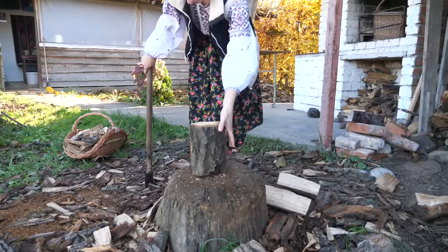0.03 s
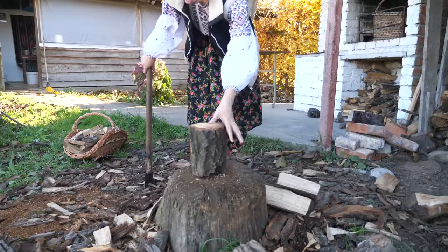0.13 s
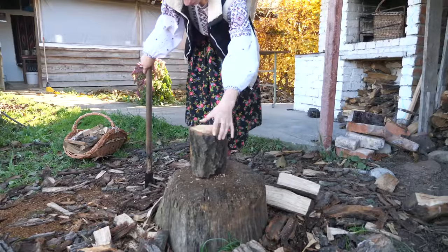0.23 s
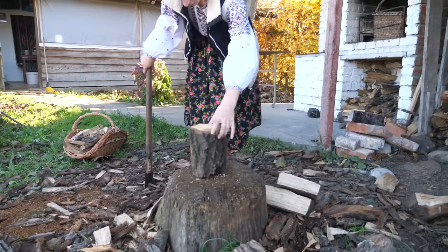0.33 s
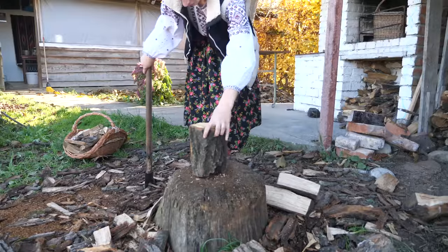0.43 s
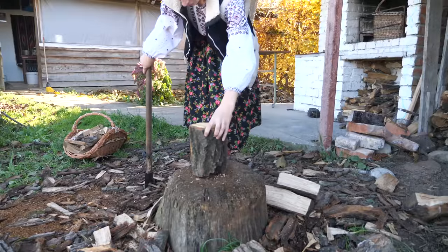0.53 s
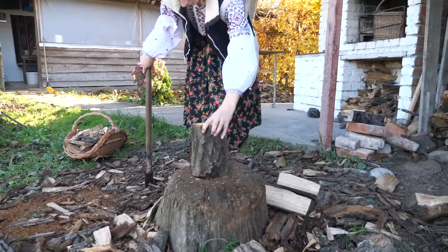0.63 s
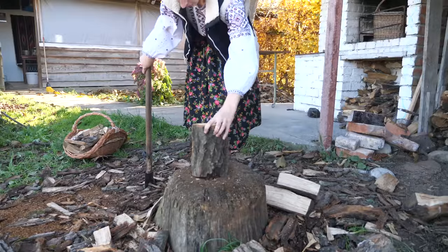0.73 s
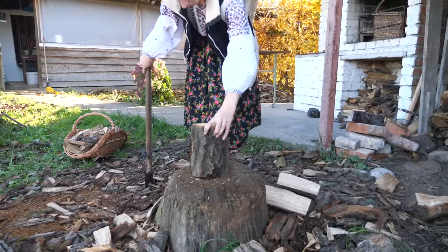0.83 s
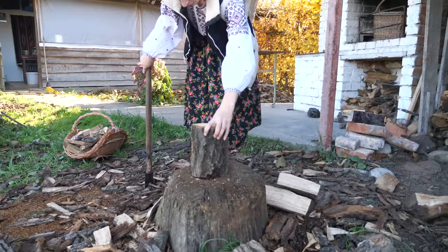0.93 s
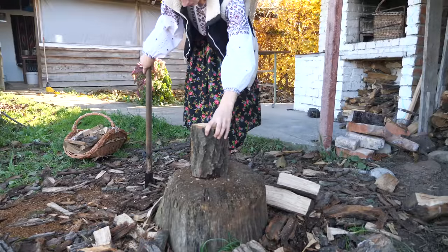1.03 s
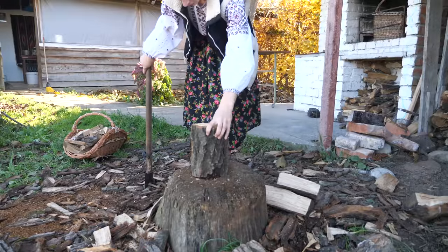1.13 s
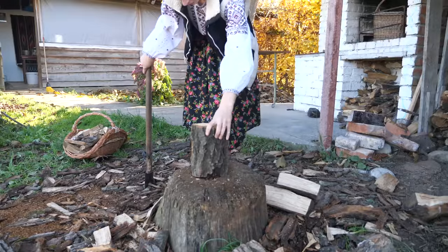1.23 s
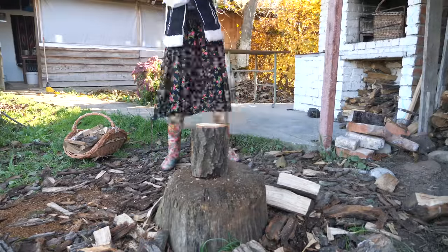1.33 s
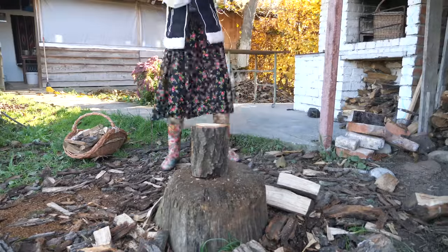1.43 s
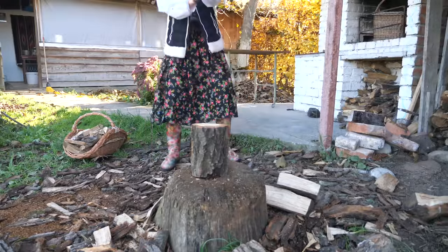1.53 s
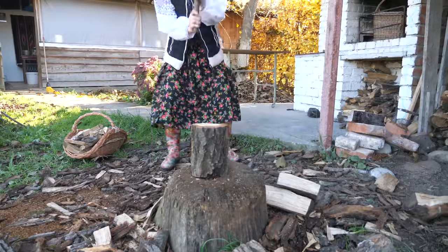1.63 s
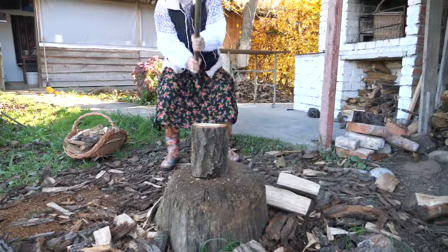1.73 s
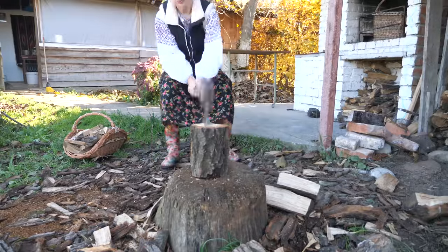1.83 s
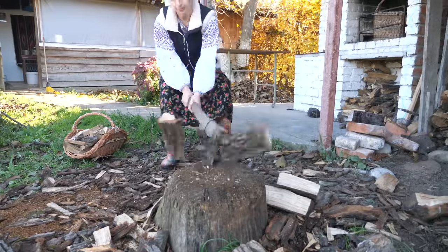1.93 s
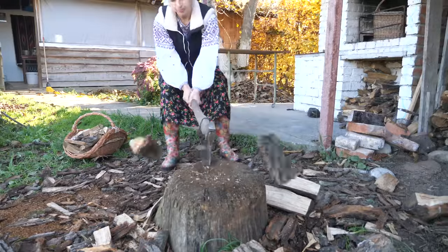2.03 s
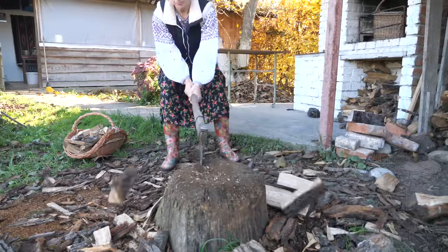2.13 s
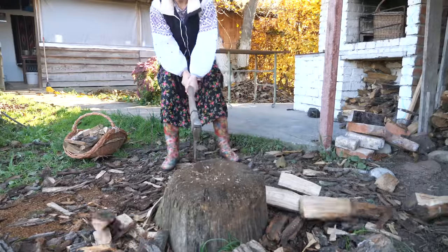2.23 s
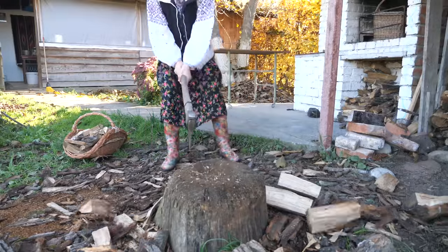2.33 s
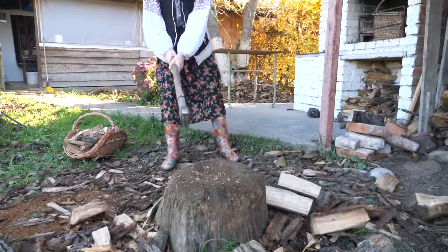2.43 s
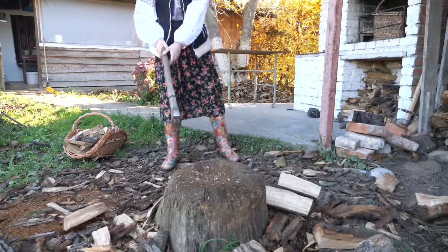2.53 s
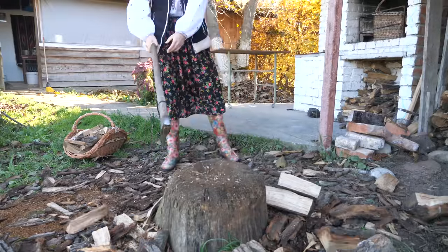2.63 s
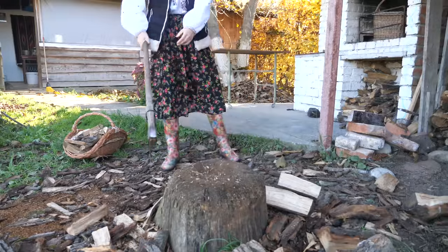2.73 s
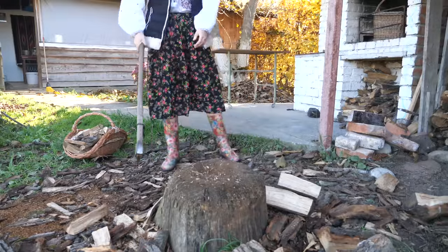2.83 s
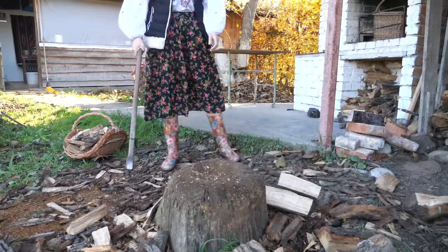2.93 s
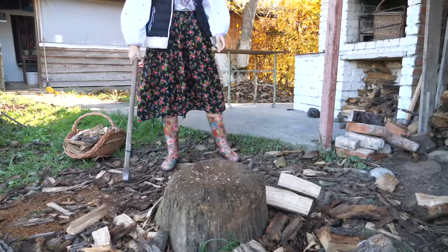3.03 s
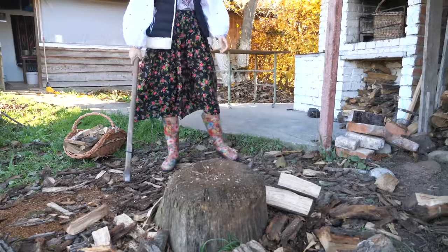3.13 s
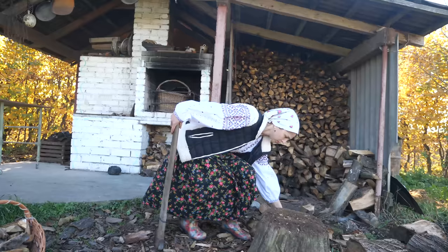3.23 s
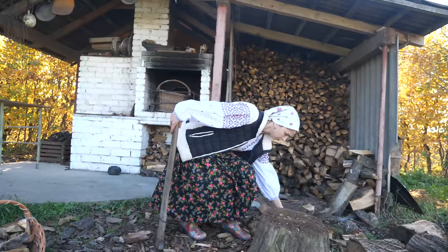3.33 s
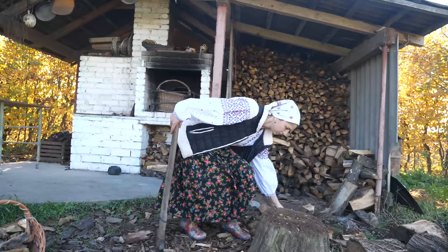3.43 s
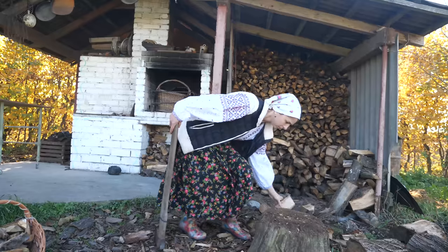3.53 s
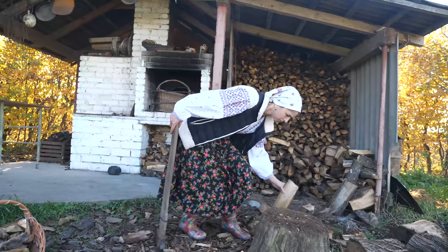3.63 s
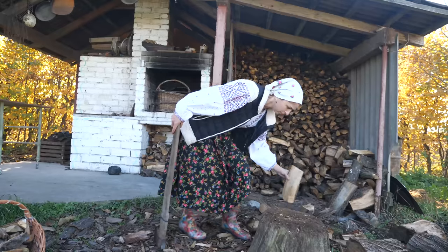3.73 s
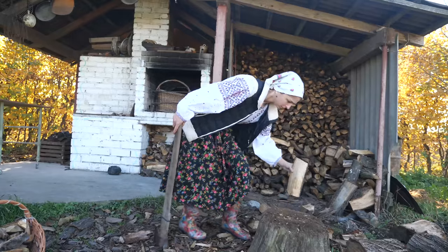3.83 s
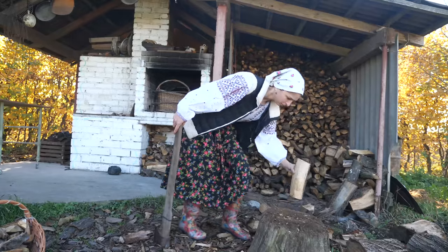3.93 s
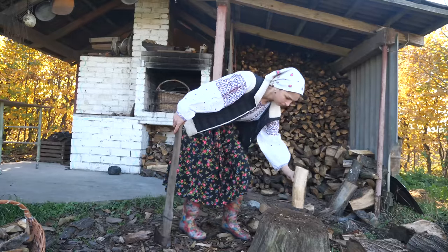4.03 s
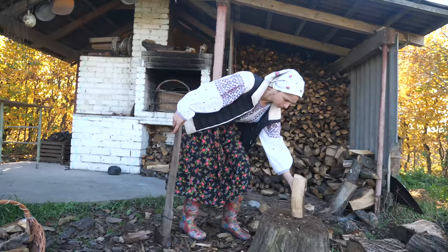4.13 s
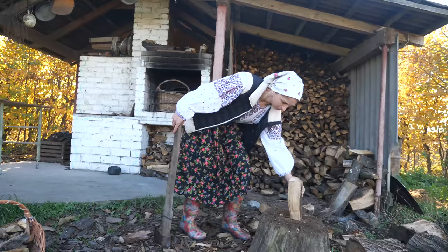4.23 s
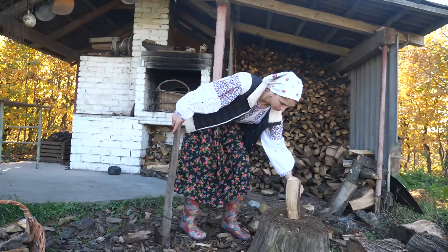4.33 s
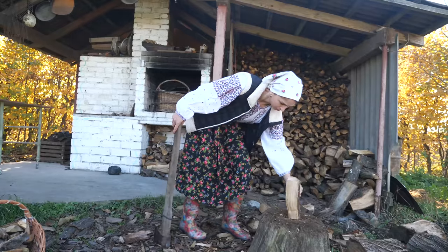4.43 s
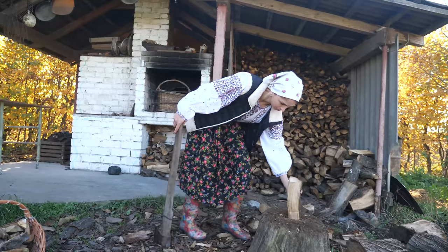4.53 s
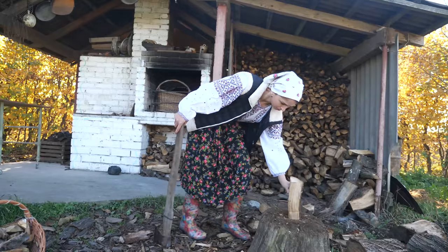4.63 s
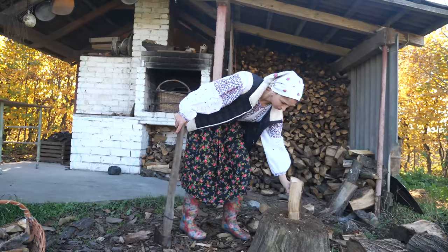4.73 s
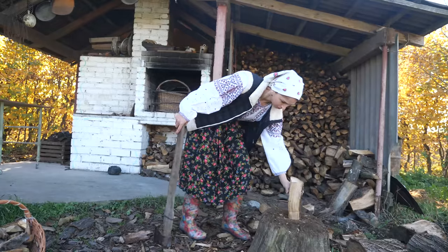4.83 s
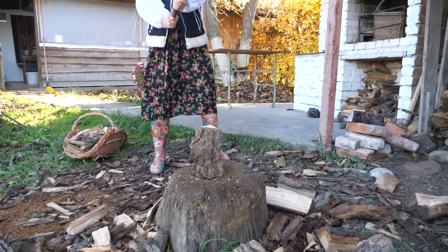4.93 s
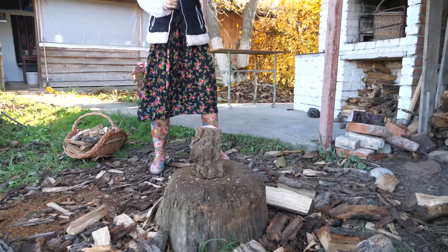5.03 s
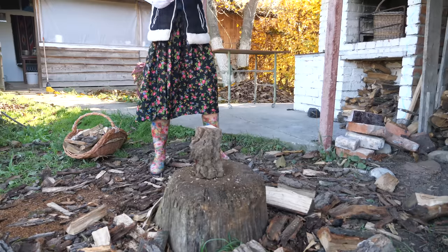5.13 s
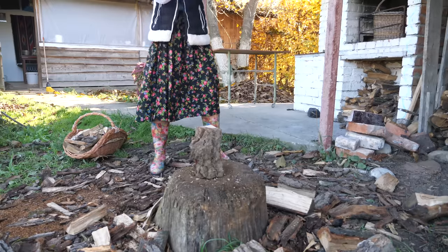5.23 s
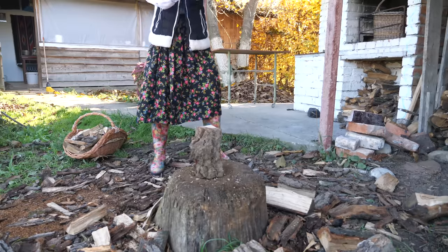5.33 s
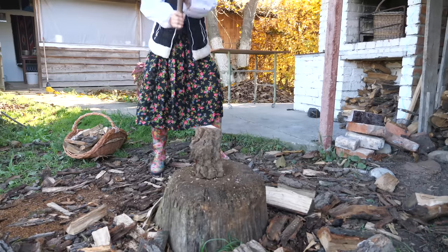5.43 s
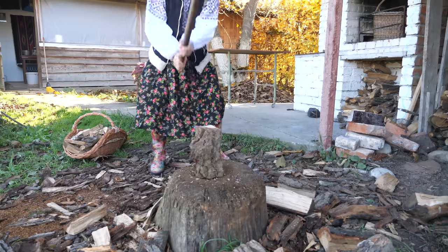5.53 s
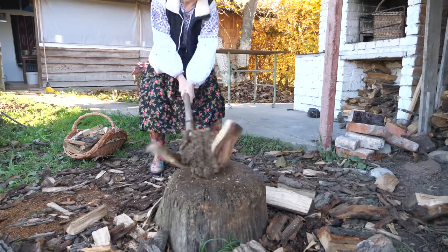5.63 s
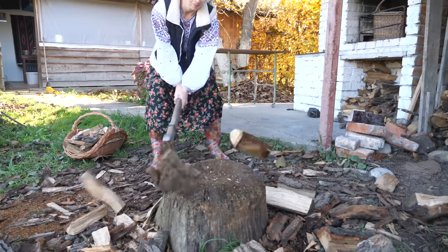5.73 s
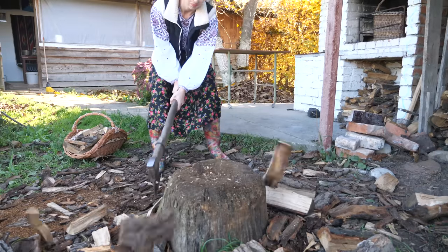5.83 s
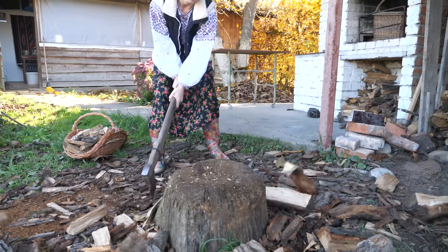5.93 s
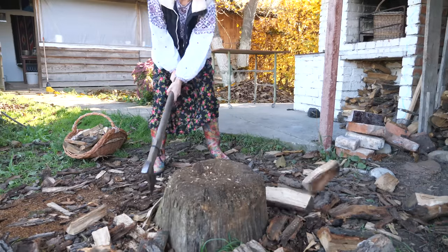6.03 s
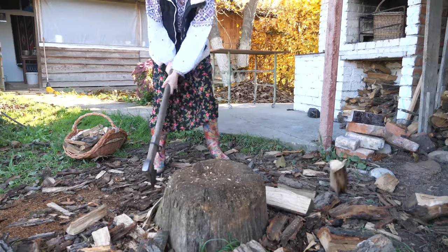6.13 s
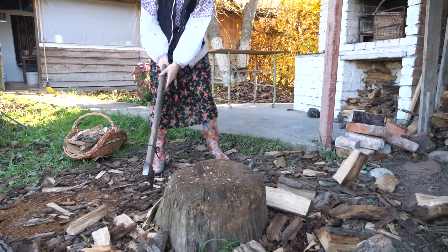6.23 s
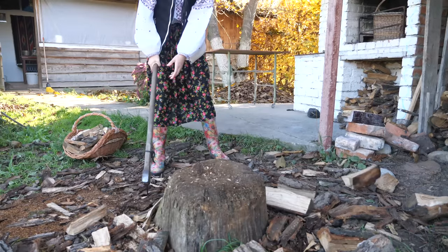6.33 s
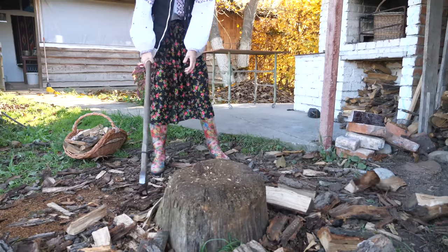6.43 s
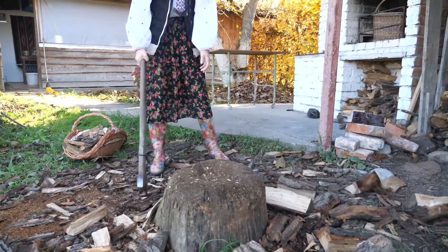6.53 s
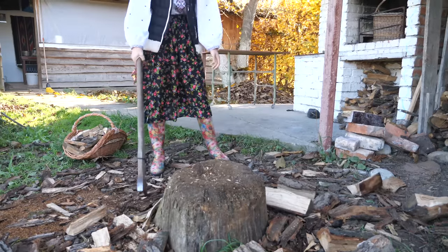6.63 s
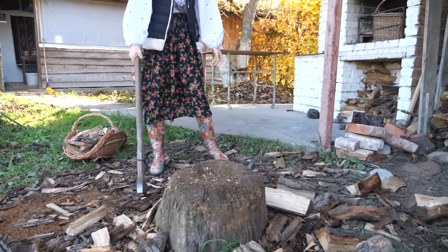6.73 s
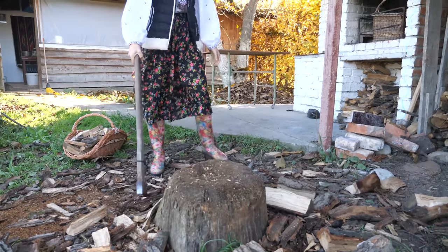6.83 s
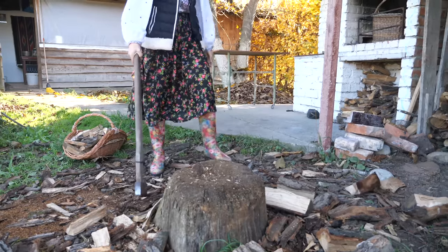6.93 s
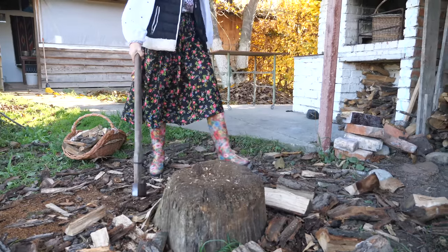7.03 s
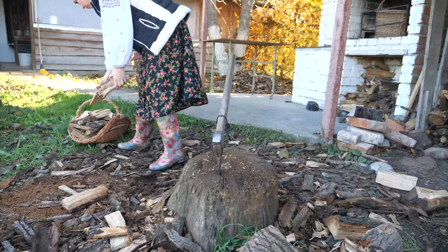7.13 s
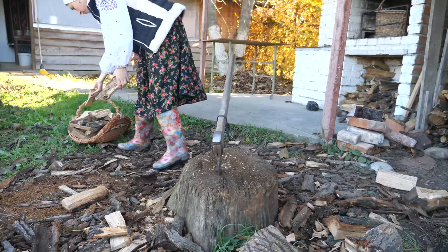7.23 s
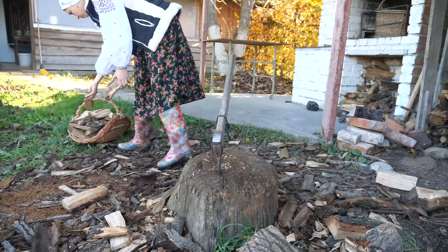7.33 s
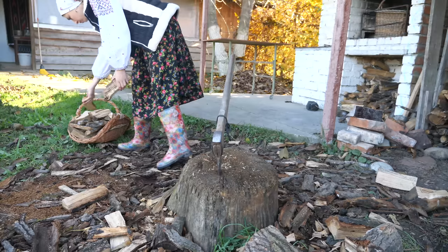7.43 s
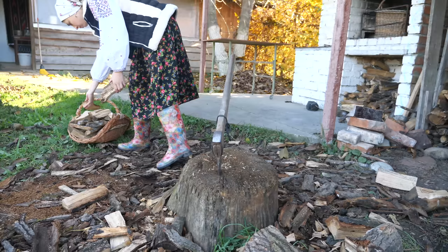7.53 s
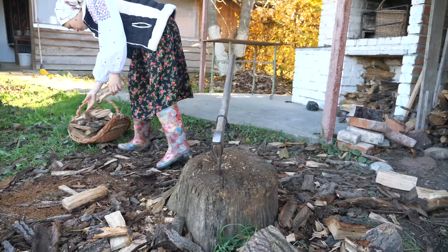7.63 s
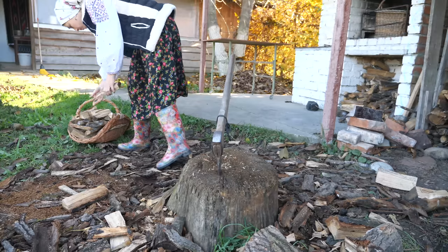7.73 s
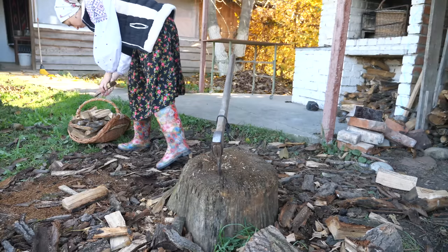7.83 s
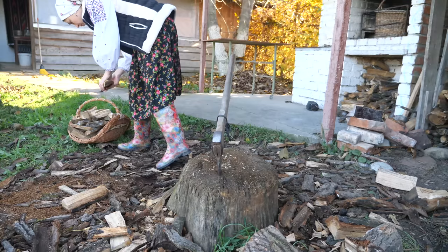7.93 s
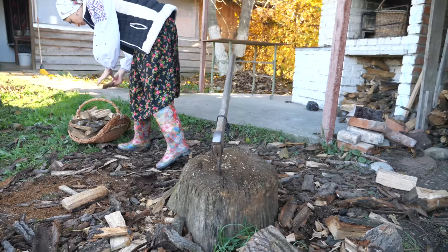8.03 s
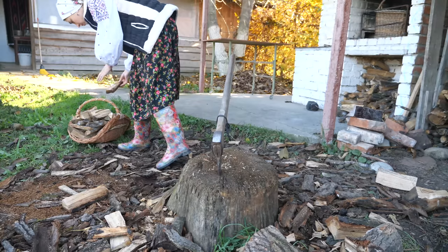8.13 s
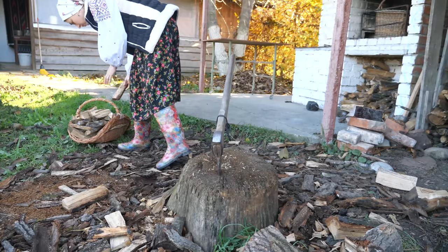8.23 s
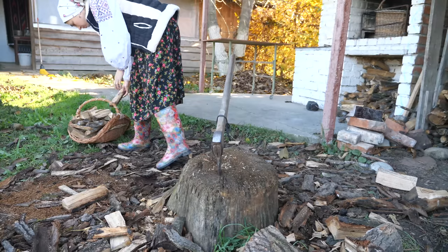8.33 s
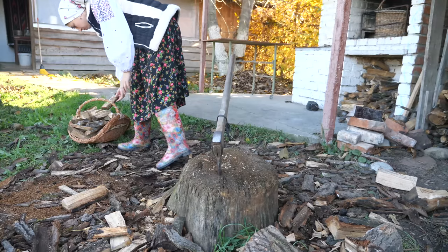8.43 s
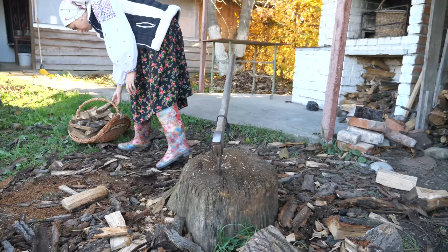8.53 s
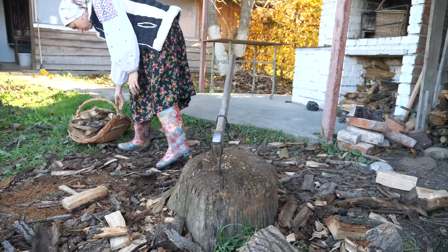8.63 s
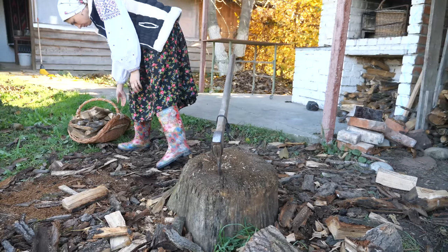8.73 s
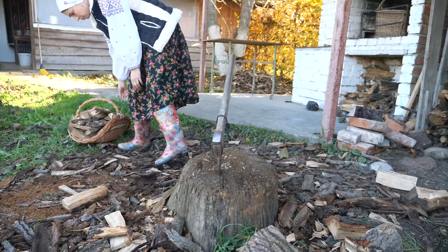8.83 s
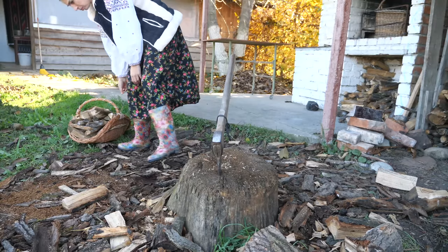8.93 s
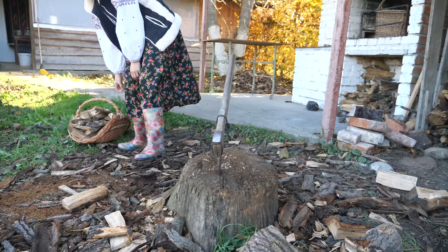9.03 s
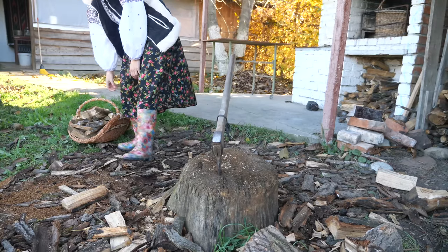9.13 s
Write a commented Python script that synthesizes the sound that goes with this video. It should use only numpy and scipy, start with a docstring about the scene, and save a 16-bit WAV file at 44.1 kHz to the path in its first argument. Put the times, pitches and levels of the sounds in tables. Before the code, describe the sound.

An axe splits two logs on a stump outdoors, halves knocking and tumbling into bark litter, with a gust of microphone wind between the blows.

```python
"""Splitting logs in a yard

An axe splits two logs on a stump: short wood rings with crackling noise, tearing grains and low ground thuds.
The pieces knock and bounce, and later kindling is dropped in a basket: smaller blows, plus a slat that rings
on. Boots and hands rustle the bark litter, made of grainy noise. Low noise buffeting quickly and unevenly is
wind on the microphone; the noise stops abruptly, and a brief low bump comes later. A faint country hiss that
changes level and soft far tones lie behind; a noise tail echoes the wood off the house and woodshed."""
import sys
import numpy as np
from scipy import signal
from scipy.fft import rfft, irfft, next_fast_len
from scipy.io import wavfile
from scipy.ndimage import uniform_filter1d

SR = 44100
rng = np.random.default_rng(int(sys.argv[2]) if len(sys.argv) > 2 else 0)


def put_to_file(sound):
    """Save the sound as 16-bit audio at rate SR, in the file named by the first command-line argument."""
    columns = np.atleast_2d(sound).T  # one column per channel
    safe = np.clip(columns, -1, 1)
    whole_steps = np.round(safe * 32767)
    wavfile.write(sys.argv[1], SR, whole_steps.astype(np.int16))


N = 405719
T = np.arange(N) / SR

# In all tables, t60_s is the time a sound takes to fall by 60 dB.
# Blade meets the log, then the stump under it: start_s, level_db, low_ring_hz, high_ring_hz, high_ring_db,
# rattle_db, crack_db, ring_t60_s, crack_t60_s, rise_ms (the three parts are relative to level_db)
AXE_BLOWS = [(1.8853, 9.5, 664, 1433, -12, -5, -10.5, 0.0085, 0.017, .6),
             (1.9149, 9, 635, 1400, -4.5, -7, -22, 0.0095, 0.015, 2.38),
             (5.6489, 7.5, 1028, 1957, -5, 1, -3.5, 0.0088, 0.019, 1.9),
             (5.6781, -1.5, 540, 1115, -3, -6, -15.5, 0.015, 0.01, 1.9)]
# Fibres tearing as the blade runs down the log: start_s, level_db, centre_hz, t60_s
FIBRE_TEARS = [(1.888, -21, 850, 0.036), (1.92, -25.5, 848, .19), (5.653, -14.5, 1250, 0.081),
               (5.684, -26, 900, 0.2)]
# Wood knocking on wood: start_s, level_db, low_ring_hz, high_ring_hz, high_ring_db, rattle_db, crack_db, ring_t60_s
WOOD_KNOCKS = [(.765, -56, 900, 4800, 2, -3, -2, .014), (1.161, -56, 750, 3450, 18, -3, 9, 0.012),
               (2.185, -16, 493, 1620, -14, -14, -26, .014), (2.1965, -25.5, 334, 1800, 5, 0, -4, .018),
               (2.236, -33, 570, 3140, -6, -3, -6, .03), (2.248, -11, 485, 2585, 2, -1, -20, .02),
               (2.2675, -9, 1037, 2600, -10, -8, -22, .022), (2.279, -31, 1070, 3260, 5, -4, -8, .018),
               (2.345, -36, 660, 1720, -21, 2.5, -12, 0.034), (2.358, -36, 1430, 3490, -22, -7, -12, 0.016),
               (2.395, -46, 1150, 5320, 4, -3, -2, .01), (2.512, -39, 1280, 2490, 1, -1, -3.5, 0.019),
               (2.526, -41, 554, 5150, -6, -5, -1, .015), (2.553, -29, 511, 4550, -11, -3, -16, 0.0085),
               (2.597, -30, 1310, 3570, -8, 0, -5, .0095), (2.634, -43, 1120, 4800, -3, -4, -7, .018),
               (3.079, -48, 1510, 2650, 6, 5.5, 5.5, 0.035), (4.35, -46, 1573, 1876, 4, -14, -14, .03),
               (5.366, -47, 1000, 1690, -9.5, 3, -28.5, 0.015), (5.791, -47, 1390, 6500, 0, -6, 0, .016),
               (5.864, -31.5, 1160, 3430, -1, 7.5, 1.5, 0.021),
               (5.9432, -23, 500, 1490, -20, -14, -20, .012), (5.9472, -9, 447, 1300, -3, -7, -15, .014),
               (5.976, -32, 420, 2570, -14, -14, -10, .02), (5.9855, -25, 950, 2600, -14, -6, -12, .02),
               (6.028, -42, 650, 4800, -6, -3, 0, .02), (6.033, -33, 650, 3060, -19, -9.5, -11, .021),
               (6.075, -43, 457, 4960, -8, -9, -12, .018), (6.109, -21.5, 1330, 2700, 0, 3, -24, .013),
               (6.176, -26, 523, 5200, -12, -8, -14, .016), (6.1805, -32, 2030, 3500, -3, 0, -6, .014),
               (6.191, -31, 1200, 1740, -9, 6, -3, .012), (6.2, -25, 1143, 1610, -7, 4, -10, .014),
               (6.363, -41, 310, 5420, -12, -6, -9, 0.027), (6.4222, -7, 824, 1950, -12, -6, -27, .011),
               (6.4288, -22, 500, 1950, -2, -6, -18, .016), (6.4485, -28, 850, 2020, -8, -6, -18, 0.013),
               (6.467, -38, 867, 4500, -2, 0, -3, .014), (6.491, -44, 680, 5300, 4, -6, 0, .014),
               (6.693, -50, 1615, 4910, 17, 0, 8, 0.016), (6.777, -48.5, 647, 2217, 0.5, 1.5, -26, 0.039),
               (6.861, -56, 312, 4700, 4, -1, -2, 0.019), (7.125, -53, 676, 4710, 4, -8, 6, 0.021),
               (7.26, -41, 496, 4990, 8, -3, 0, 0.012), (7.277, -45, 737, 5320, 8, -10, -4, 0.015),
               (7.324, -47.5, 829, 5230, -8.5, -8, -13, .015), (7.396, -46, 1450, 3220, -13, -9, 1, 0.024),
               (7.411, -52, 654, 5340, 3.5, 2, 4, 0.01), (7.48, -52.5, 613, 5470, 8, -16, 7, .024),
               (7.497, -58, 613, 5000, 0, -16, 8, .02), (7.615, -39.5, 1414, 1547, -8, -16, -15, 0.021),
               (7.624, -39, 1414, 3450, 10, -2, -2, 0.025), (7.642, -35, 1493, 3470, -6, -7, -6, 0.05),
               (7.686, -49.5, 1500, 3520, 6, -10, 3, 0.017), (7.718, -41, 650, 3120, -9, -4, -12, .02),
               (7.725, -35, 940, 1580, -23.5, -6.5, -14, .05), (8.572, -43, 676, 1640, -5, -2, -23, .016),
               (8.609, -44, 930, 1604, -12, 0, -20, .015), (8.628, -39.5, 1370, 3520, -9, -5, -7, .07)]
# Spectrum of cracking wood, only its shape counts: pitch_hz, level_db
CRACK_SPECTRUM = [(88, -43.5), (150, -9), (789, 0), (1420, -4), (2050, -6.5), (2310, -12.5), (4750, -18),
                  (6130, -20), (9790, -27), (16000, -36)]
# Ringing modes of a dry slat: pitch_hz, level_db, t60_s
SLAT_MODES = [(702, -7, .1), (1356, 1, .12), (2364, 5, .08), (3500, -5, .11), (5100, -3, .11)]
# Taps on the slat: start_s, level_db
SLAT_TAPS = [(6.111, -39), (6.245, -55), (6.288, -66)]
# The ground booms under the stump and the heavier pieces: start_s, level_db, t60_s
GROUND_THUDS = [(1.89, -25, .45), (1.914, -27, .4), (2.249, -42, .17), (5.678, -30, .54), (5.947, -44, .21),
                (6.031, -37, 0.087), (6.19, -41, .16), (6.424, -29, .15), (8.63, -54, .5)]
# How long each band of the yard echo lasts: centre_hz, t60_s
YARD_DECAY = [(200, .27), (450, .25), (900, .23), (1800, .22), (3600, .19), (7000, .15), (12500, .11)]
# Strength of the echo in each of those bands, relative: level_db
YARD_LEVELS = [-22, -21.5, -20, -18.5, -19, -21, -23.5]
# Bark and leaves keep rustling while pieces and boots move: start_s, end_s, level_db
LITTER_BEDS = [(2.189, 3.15, -65.5), (5.87, 6.8, -67.5), (6.799, 7.851, -74), (8.3, 9.2, -79.5)]
# Pieces and boots crunch through the litter: peak_s, level_db, rise_s, t60_s, treble_share_db
LITTER_CRUNCHES = [(2.2, -46, .013, 0.11, -6), (2.27, -48, 0.038, 0.18, -18),
                   (2.352, -48.5, .0052, 0.07, -9), (2.514, -56.5, 0.028, .12, -20),
                   (2.566, -45.5, 0.038, .14, -11), (2.599, -43, 0.022, 0.21, -4.5),
                   (2.67, -62.5, 0.057, .17, -20), (3.085, -50, 0.011, 0.054, -23),
                   (5.87, -37, .005, 0.038, -25), (5.96, -54, .011, 0.22, 1),
                   (6.033, -55, .0096, .078, -13), (6.12, -47.5, .013, 0.15, -35),
                   (6.19, -52, 0.047, .071, -22), (6.378, -58, 0.026, 0.11, -12),
                   (6.43, -47, .008, .15, -42), (6.479, -49, 0.034, 0.088, -23),
                   (6.785, -63, .0077, .074, -18), (6.88, -67.5, 0.061, 0.24, -10),
                   (7.07, -65.5, .05, .2, -12), (7.262, -47.5, .0072, 0.076, 1),
                   (7.402, -60, .006, 0.063, 8), (7.65, -52.5, 0.019, 0.18, -24),
                   (7.731, -58, .01, 0.13, -38), (8.61, -66, 0.036, .13, -40), (8.633, -55, .011, .14, -28),
                   (9.19, -68.5, 0.14, .1, -15)]
# Spectrum of the rustle, only its shape counts: pitch_hz, level_db
LITTER_SPECTRUM = [(710, -31), (1200, -1.5), (1440, 0.5), (1720, -4.5), (5400, -0.5), (6710, -14),
                   (9590, -15.5), (14800, -18), (16000, -14)]
# A hand scuffs the bark and shifts the log: centre_s, level_db, centre_hz
HAND_SCUFFS = [(.032, -61.5, 2480), (.125, -62, 3460), (.25, -56, 3000), (.34, -69.5, 3000),
               (.49, -66, 3600), (.597, -68, 3500), (.662, -69.5, 4050), (.95, -74, 4470),
               (1.049, -71.5, 3500), (4.313, -72, 1940), (4.364, -65.5, 1766)]
# Two lists of points, wind on the microphone and then a brief low bump: time_s, level_db
WIND_AND_BUMP = [
    [(3.24, -52), (3.252, -44.5), (3.3, -37.5), (3.382, -48), (3.43, -36), (3.484, -41.5), (3.526, -33.5),
     (3.684, -41.5), (3.716, -36), (3.79, -38), (3.814, -46), (3.842, -37), (3.892, -32), (4.06, -45),
     (4.096, -40), (4.142, -53), (4.208, -35.5), (4.296, -48.5), (4.338, -44), (4.49, -51), (4.578, -37),
     (4.778, -50), (4.894, -40), (4.905, -42)],
    [(7.05, -54), (7.066, -51), (7.088, -47), (7.106, -47)],
]
# Spectrum of both, only its shape counts: pitch_hz, level_db
GUST_SPECTRUM = [(8.8, -31.5), (15, -1), (40, -7), (113, -9), (234, -20), (372, -35), (414, -28.5),
                 (514, -46), (600, -44.5), (780, -76), (1320, -120)]
# A lighter breeze, deep rumble only: time_s, level_db
LIGHT_BREEZE = [(6.46, -56), (6.69, -55), (6.79, -63), (6.84, -46), (6.91, -59.5), (7.04, -59),
                (7.08, -43.5), (7.14, -60), (7.3, -71), (7.44, -61), (7.52, -83), (7.96, -65), (8.25, -79),
                (8.34, -63), (8.39, -80), (8.75, -76), (8.76, -70), (9.19, -70.5)]
# Faint far tones: start_s, length_s, pitch_hz, level_db
FAR_TONES = [(1.34, 0.27, 560, -75.5), (4.255, 0.087, 429, -65), (4.255, .1, 860, -81),
             (4.255, 0.12, 1286, -72.5)]
# Background hiss over time: time_s, low_part_db, middle_part_db
AIR_LEVELS = [(0, -71, -72.5), (1.18, -74, -75.5), (1.5, -71, -72.5), (1.8, -69.5, -69.5),
              (2.8, -68, -67.5), (3.15, -73, -69), (3.25, -70.5, -72.5), (4.88, -71.5, -77.5),
              (4.95, -71, -73), (5.55, -70.5, -71), (6.55, -71, -68.5), (6.85, -71, -75.5),
              (7.15, -66.5, -74), (7.5, -66.5, -69), (7.98, -67.5, -76.5), (8.47, -69.5, -72.5),
              (8.84, -67, -76.5), (9.2, -68, -69)]
# Spectrum of the background hiss, only its shape counts: pitch_hz, level_db
AIR_SPECTRUM = [(29, -30.5), (50, -3.5), (145, -11), (213, -5.5), (252, -13), (305, -5.5), (344, -10.5),
                (398, -8), (677, -9), (1910, -15), (3250, -14.5), (5260, -16), (6230, -23.5),
                (14100, -30.5), (16000, -37)]
# Peaks and dips of the microphone: centre_hz, width_hz, level_db
MIC_PEAKS = [(2580, 1500, -0.5), (3460, 400, 2.5), (4060, 400, -3), (4940, 1000, 0.5)]

KNOCK_RISE_MS = 1.3
KNOCK_CRACK_T60_S, CRACK_S_PER_DB = .044, .00036  # for a knock at 0 dB; weaker knocks crackle shorter
SWING_DB, SWING_HZ = -62, 520  # rush of air just before the blade lands
SWING_GROWTH_S = .36  # time in which the rush grows by 60 dB
GROUND_ECHO_DB = -1.5  # pieces on the ground reach the walls less than the axe on the stump
LITTER_TREBLE_DB = -12.5  # treble share of the rustling beds
BASS_DB, BASS_PER_TREBLE = -9.5, -0.42  # the duller the rustle, the more bass it has
SCUFF_S = .055
WIND_BRIGHT_DB, WIND_STRONG_DB, BRIGHT_PER_DB = -16, -35, .6  # upper share at a strong gust, and its slope
CALM_DB = -84  # breeze level outside its table
TOP_HZ = 15900  # nearly everything above is cut


def undb(db):
    """Turns decibels into a plain loudness factor."""
    return 10 ** (np.asarray(db) / 20)


def unit(x):
    """Scales a sound to an average (rms) strength of 1."""
    return x / np.sqrt(np.mean(x ** 2))


def colour(x, points):
    """Shapes the spectrum by points of pitch and level."""
    hz, db = np.transpose(points)
    size = next_fast_len(len(x))
    f = np.maximum(np.fft.rfftfreq(size, 1 / SR), 1)
    gain = undb(np.interp(np.log(f), np.log(hz), db))
    return irfft(rfft(x, size) * gain, size)[:len(x)]


def band(x, low_hz, high_hz):
    """Keeps mainly the pitches between two limits."""
    return signal.sosfilt(signal.butter(2, [low_hz, high_hz], "band", fs=SR, output="sos"), x)


def fade(t, t60):
    """Falls by 60 dB in t60 seconds."""
    return np.exp(-np.log(1000) * t / max(t60, 1e-3))


def add(track, start_s, sound):
    """Mixes a sound into the track at a given time."""
    i = int(start_s * SR)
    track[..., i:i + np.shape(sound)[-1]] += sound[..., :N - i]


def curve(tables, column, rest):
    """Draws one column of several tables over time, with the rest value outside them."""
    out = np.full(N, rest)
    for rows in map(np.array, tables):
        inside = (T >= rows[0, 0]) & (T <= rows[-1, 0])
        out[inside] = np.interp(T[inside], rows[:, 0], rows[:, column])
    return out


def walk(rate_hz):
    """Wanders smoothly between random values that change rate_hz times a second."""
    hold = int(SR / rate_hz)
    steps = np.repeat(rng.standard_normal(N // hold + 1), hold)
    smooth = uniform_filter1d(uniform_filter1d(steps, hold), hold)
    return 1.4 * smooth[:N]  # makes up for the spread lost in smoothing


def blows(table):
    """Each blow rings two short wood modes, rattles broadly and splits off bright crackle."""
    out, t = np.zeros(N), T[:SR // 10]
    for start_s, db, low_hz, high_hz, high_db, rattle_db, crack_db, ring_t60, crack_t60, rise_ms in table:
        crackle = colour(rng.standard_normal(len(t)), CRACK_SPECTRUM)
        rattle = unit(band(crackle, 0.54 * low_hz, 6000))  # a small piece has no bass
        # the highest treble gets an extra fade, so it dies first
        top = band(crackle, 5400, 15500) * 2.5 * fade(t, 1.3 * crack_t60)
        hiss = unit(band(crackle, 2500, 6500)) + top / np.std(band(crackle, 1800, 6500))
        # higher modes lose more to the fibres
        high = np.sin(2 * np.pi * high_hz * t) * fade(t, ring_t60 * 4000 / high_hz)
        low = np.sin(2 * np.pi * low_hz * t)
        ring = undb(high_db) * high - low
        body = (ring + undb(rattle_db) * rattle) * fade(t, ring_t60)
        crack = undb(crack_db) * hiss * fade(t, crack_t60)
        # a softer contact builds up longer
        rise = np.sin(np.pi / 2 * np.minimum(1000 * t / max(rise_ms, .1), 1)) ** 2
        add(out, start_s, undb(db) * rise * (body + crack))
    return out


def tearing():
    """Fibres give way in dense uneven snaps, coloured by the log."""
    out, t = np.zeros(N), T[:SR // 4]
    for start_s, db, hz, t60 in FIBRE_TEARS:
        snaps = rng.standard_normal(len(t)) * undb(2.0 * rng.exponential(size=len(t)))
        log = unit(band(snaps, hz / 1.7, hz * 1.6))
        fibres = 1.3 * unit(colour(snaps, CRACK_SPECTRUM))
        add(out, start_s, undb(db) * (log + fibres) * fade(t, t60))
    return out


def swings():
    """Air rushes around the axe, growing until the blade lands on each log."""
    hiss = colour(rng.standard_normal(N), AIR_SPECTRUM)
    rush = unit(band(hiss, SWING_HZ / 1.4, SWING_HZ * 1.4))
    level = np.zeros(N)
    for land_s, *_ in AXE_BLOWS[::2]:  # every other row is the stump
        level += undb(SWING_DB) * (T < land_s) * fade(np.abs(land_s - T), SWING_GROWTH_S)
    return level * rush


def thuds():
    """Low noise swells in a few milliseconds and dies in the soil, its deepest part last."""
    out, t = np.zeros(N), T[:SR // 2]
    for start_s, db, t60 in GROUND_THUDS:
        noise = rng.standard_normal(len(t))
        knock = unit(band(noise, 170, 380)) * fade(t, .5 * t60)
        boom = 0.06 * unit(band(noise, 35, 170)) * fade(t, t60)
        add(out, start_s, undb(db) * (knock + boom) * (1 - np.exp(-t / 0.0014)))
    return out


def knocks():
    """Blows share one contact time; the harder the knock, the longer it crackles."""
    table = []
    for row in WOOD_KNOCKS:
        crack_t60 = KNOCK_CRACK_T60_S + CRACK_S_PER_DB * row[1]
        table.append((*row, crack_t60, KNOCK_RISE_MS))
    return blows(table)


def slat():
    """A dry slat rings on with the same modes for every tap."""
    out, t = np.zeros(N), T[:SR // 3]
    ring = sum(undb(db) * np.sin(2 * np.pi * hz * t) * fade(t, t60) for hz, db, t60 in SLAT_MODES)
    for start_s, db in SLAT_TAPS:
        add(out, start_s, undb(db) * ring)
    return out


def yard(dry):
    """Walls and stacked wood scatter the sound back; the treble dies first."""
    t, tail = T[:SR // 2], 0
    for (hz, t60), db in zip(YARD_DECAY, YARD_LEVELS):
        noise = unit(band(rng.standard_normal(len(t)), hz / np.sqrt(2), hz * np.sqrt(2)))
        tail = tail + undb(db - 20) * np.sqrt(hz / SR) * noise * fade(t, t60)
    build_up = 1 - np.exp(-t / 0.0029)
    return signal.fftconvolve(dry, tail * build_up)[:N]


def litter():
    """Tiny grains carry separate snaps; heavier bits give a duller part, dry leaves a brighter one."""
    grains = rng.standard_normal(N) * undb(2.53 * rng.exponential(size=N) + 1.4 * walk(120))
    snaps = (rng.random(N) < 90 / SR) * undb(3. * rng.standard_normal(N))  # about 90 a second
    burst = signal.fftconvolve(snaps, fade(T[:SR // 50], 0.011))[:N]
    grains = grains * (1 + 1.1 * burst)
    tinted = colour(grains, LITTER_SPECTRUM)
    dull, bright = unit(band(grains, 250, 1400)), unit(band(tinted, 5500, 15500))

    swells = []
    for start_s, end_s, db in LITTER_BEDS:
        shape = np.hanning(int((end_s - start_s) * SR)) ** .3
        swells.append((start_s, db, shape, LITTER_TREBLE_DB))
    for peak_s, db, rise_s, t60, treble_db in LITTER_CRUNCHES:
        rise = np.linspace(0, 1, int(rise_s * SR)) ** 2
        shape = np.concatenate([rise, fade(T[:SR // 2], t60)])
        swells.append((peak_s - rise_s, db, shape, treble_db))

    gains = np.zeros((3, N))  # whole rustle, dull part, bright part
    for start_s, db, shape, treble_db in swells:
        dull_db = db + BASS_DB + BASS_PER_TREBLE * treble_db
        add(gains, start_s, np.outer(undb([db, dull_db, db + treble_db]), shape))
    return gains[0] * unit(tinted) + gains[1] * dull + gains[2] * bright


def scuffs():
    """Short grainy rubs swell and fade around a centre."""
    out, size = np.zeros(N), int(SCUFF_S * SR)
    for centre_s, db, hz in HAND_SCUFFS:
        grit = rng.standard_normal(SR // 5) * undb(2.5 * rng.exponential(size=SR // 5))
        rub = unit(band(grit, hz / 1.6, hz * 1.47))[:size]
        add(out, max(centre_s - SCUFF_S / 2, 0), undb(db) * np.hanning(size) * rub)
    return out


def wind_and_bump():
    """Eddies buffet the microphone, stronger ones higher in pitch; a brief low bump shares their noise."""
    eddies = colour(rng.standard_normal(N), GUST_SPECTRUM) * undb(1.6 * walk(25))
    high = unit(band(eddies, 199, 360))
    low = unit(signal.sosfilt(signal.butter(3, 130, fs=SR, output="sos"), eddies))
    level_db = curve(WIND_AND_BUMP, 1, -120.)
    bright_db = WIND_BRIGHT_DB + BRIGHT_PER_DB * (level_db - WIND_STRONG_DB) + 2.5 * walk(12)
    return uniform_filter1d(undb(level_db), size=200) * (low + undb(bright_db) * high)


def breeze():
    """A lighter breeze makes only a deep rumble that wavers in level."""
    deep = unit(band(band(rng.standard_normal(N), 10, 42), 10, 42))
    level = undb(curve([LIGHT_BREEZE], 1, 1. * CALM_DB) + 2.2 * walk(5))
    return uniform_filter1d(level, size=2000) * deep


def tones():
    """Soft, slightly wavering sines swell and fade."""
    out = np.zeros(N)
    for start_s, length_s, hz, db in FAR_TONES:
        size = int(length_s * SR)
        pitch_hz = hz * (1 + .006 * walk(33)[:size])
        swell = np.sqrt(2 * np.hanning(size))
        add(out, start_s, undb(db) * swell * np.sin(2 * np.pi * np.cumsum(pitch_hz) / SR))
    return out


def air():
    """Distant leaves and microphone hiss: the level changes at times, low and middle parts waver, the top is steady."""
    hiss = colour(rng.standard_normal(N), AIR_SPECTRUM)
    low = signal.sosfiltfilt(signal.butter(2, 1700, fs=SR, output="sos"), hiss)
    top = hiss - signal.sosfiltfilt(signal.butter(2, 7000, fs=SR, output="sos"), hiss)
    middle = hiss - low - top
    low_level = undb(curve([AIR_LEVELS], 1, -70.) + 0.92 * walk(10))
    middle_level = undb(curve([AIR_LEVELS], 2, -70.) + 1.1 * walk(18))
    return low_level * unit(low) + middle_level * unit(middle) + undb(-82.0) * unit(top)


def scene():
    """Mixes the wood and its echoes with the ground, the litter and the background."""
    axe = blows(AXE_BLOWS) + tearing()
    pieces = knocks() + slat()
    wood = axe + pieces + yard(axe + undb(GROUND_ECHO_DB) * pieces)
    ground = thuds() + litter() + scuffs()
    background = wind_and_bump() + breeze() + tones() + air()
    return (wood + swings() + ground + background)[None]


def record(dry):
    """The microphone has its own peaks in the treble; the axe overloads the input; the top is cut."""
    size = next_fast_len(N)
    f = np.fft.rfftfreq(size, 1 / SR)
    mic_db = sum(db / (1 + (2 * (f - hz) / width) ** 2) for hz, width, db in MIC_PEAKS)
    heard = irfft(rfft(dry, size) * undb(mic_db), size)[:, :N]
    clipped = np.clip(heard, -.95, .95)
    return signal.sosfilt(signal.ellip(8, .2, 70, TOP_HZ, fs=SR, output="sos"), clipped)


dry = scene()
out = record(dry)
put_to_file(out)
```